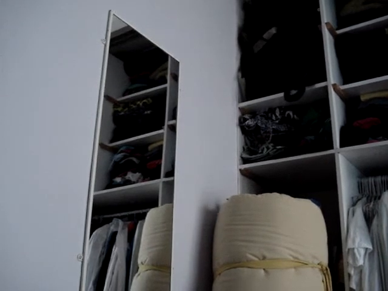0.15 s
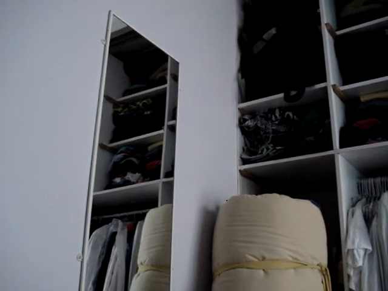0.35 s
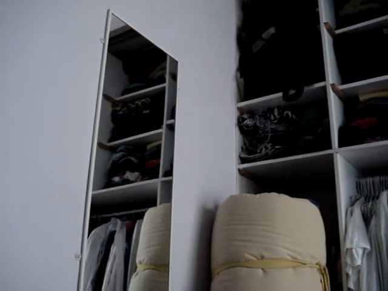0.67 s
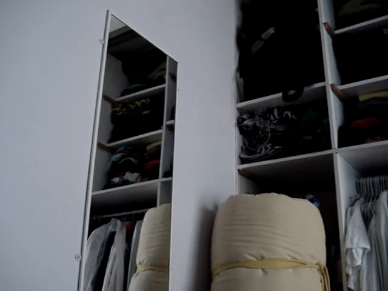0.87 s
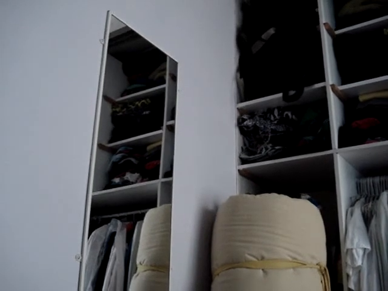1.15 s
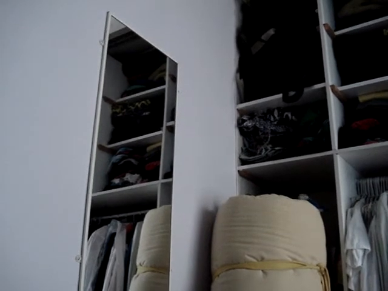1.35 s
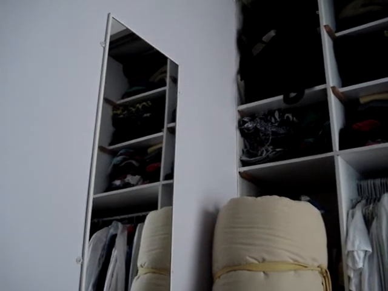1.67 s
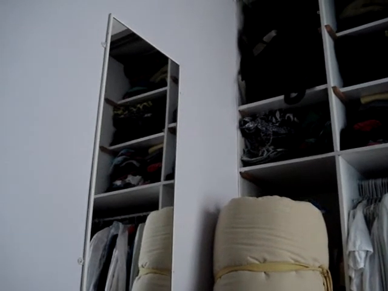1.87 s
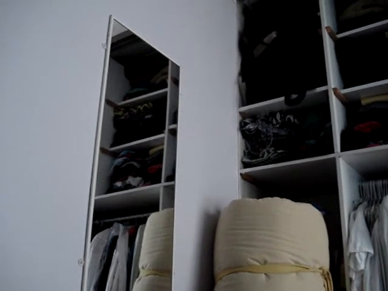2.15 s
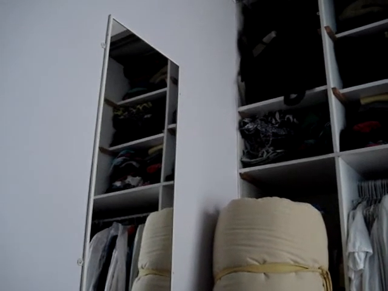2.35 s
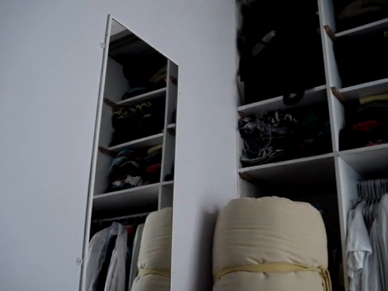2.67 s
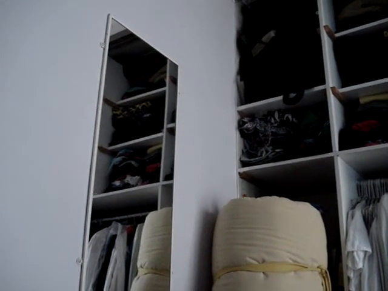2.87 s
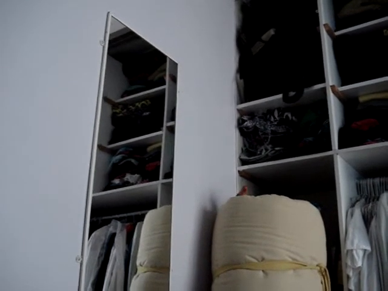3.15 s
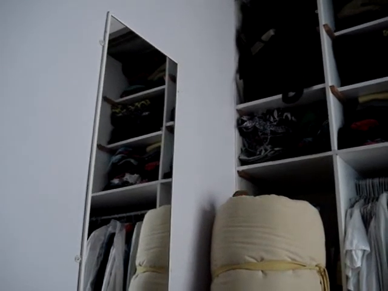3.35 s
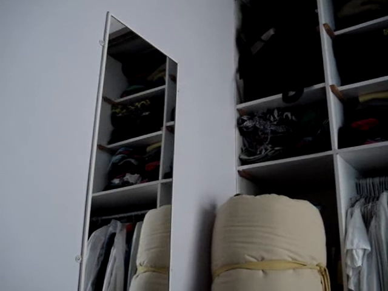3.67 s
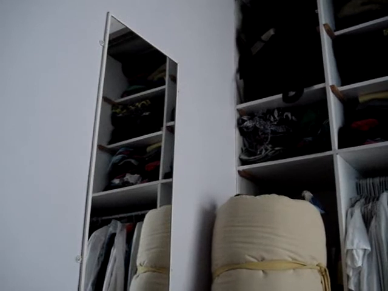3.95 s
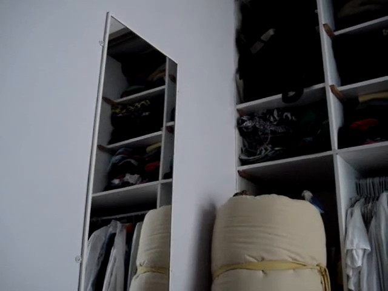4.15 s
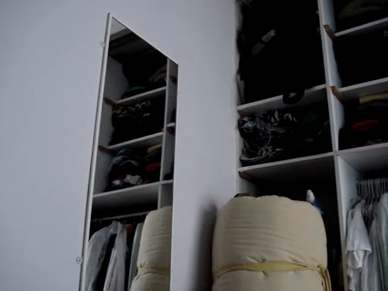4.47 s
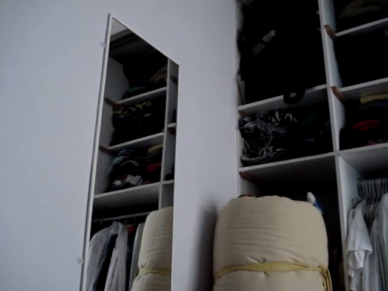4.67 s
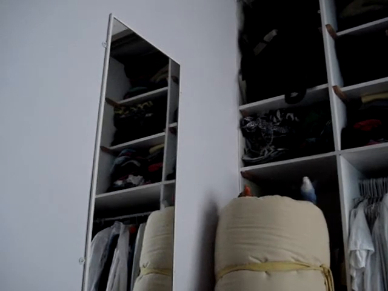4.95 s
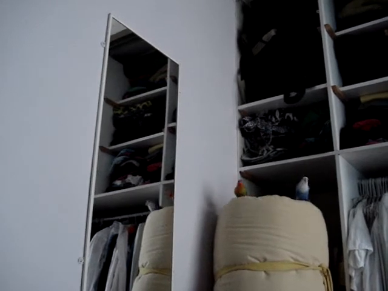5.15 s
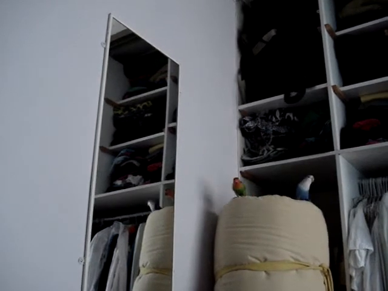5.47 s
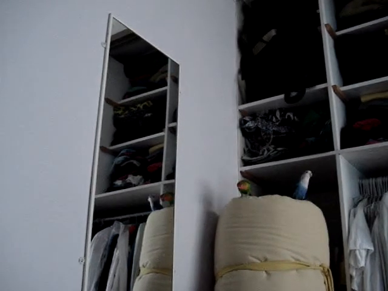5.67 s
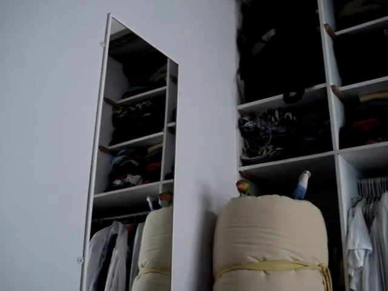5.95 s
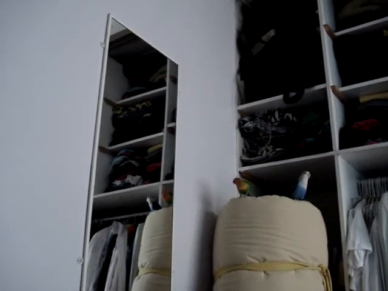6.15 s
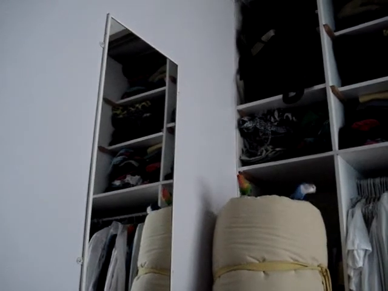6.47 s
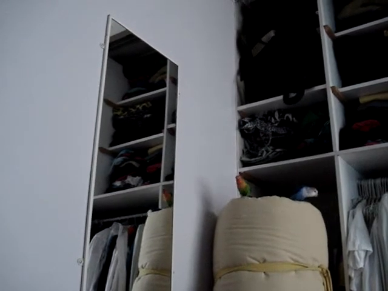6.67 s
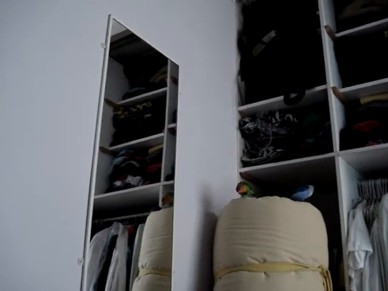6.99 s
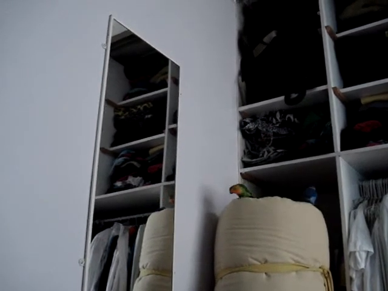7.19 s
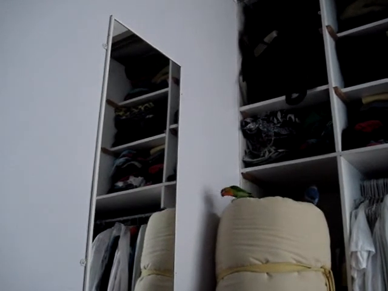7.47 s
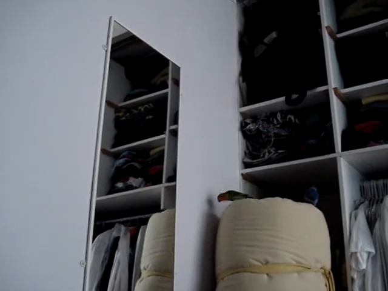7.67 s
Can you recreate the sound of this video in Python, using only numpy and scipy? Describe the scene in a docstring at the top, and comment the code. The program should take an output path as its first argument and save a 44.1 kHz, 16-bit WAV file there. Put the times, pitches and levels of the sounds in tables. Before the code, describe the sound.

A small, quiet bedroom with a soft, even rush of air and light recorder hiss. A pet lovebird gives one thin, very high peep, then after a long pause another. About a second later comes a rapid run of four chirps, a faint one first, then three loud, harsher ones, each lower. The microphone clicks and pops on the calls, and the room noise dips, then creeps back.

```python
"""Two thin, separate lovebird peeps, then a quick run of four harsher chirps, each lower than the last,
in a small, quiet bedroom. Each call is a short swooping tone with overtones, shaped by the throat and smeared
by scattered wall echoes and a noise tail. Decaying ticks and offsets make the microphone pop at the calls.
The run pushes the recorder's gain down, so the soft noise of the room sinks and creeps back; hiss lies on top."""
import sys
import numpy as np
from scipy import signal
from scipy.fft import rfft, irfft
from scipy.io import wavfile
from scipy.ndimage import uniform_filter1d

SR = 44100
rng = np.random.default_rng(int(sys.argv[2]) if len(sys.argv) > 2 else 0)


def pcm_store(signal):
    """Save signal as 16-bit PCM."""
    levels = np.round(np.clip(np.atleast_2d(signal), -1, 1) * 32767)
    wavfile.write(sys.argv[1], SR, levels.astype(np.int16).T)


N = 344752  # length of the scene in samples

# Lovebird calls: start_s, length_s, level_db, fade_db (fall over the call; negative swells), roughness_0to1,
# pitch_hz (middle), depth_share (swoop against the pitch), crest_share (place of the crest in the call)
CALLS = [ (0.955, 0.022, -21.5, -13, 0.1, 6200, 0.053, 0.52),
         (3.915, 0.021, -19.5, 2, 0.09, 6816, 0.058, 0.59), (5.042, 0.012, -31, 22, 0.21, 4175, 0.061, .03),
         (5.148, 0.024, -10, 7.5, 0.2, 3082, 0.099, 0.634), (5.227, .028, -10, 3, 0.25, 2786, 0.127, .7),
         (5.321, 0.02195, -10.5, 2.5, 0.57, 2520, 0.0895, 0.328)]
# How the throat and open beak pass each overtone: frequency_hz, gain_db
THROAT = [(1400, -25), (2000, -13), (2400, -4), (2800, -8), (3300, 1.5), (4200, -1.5), (5500, 3),
          (6400, -1), (7400, -1), (8400, -14), (9800, -19.5), (11200, -82.5)]
# Strongest echoes from the wardrobe, walls and ceiling: delay_s, level_db (against the direct sound)
ECHOES = [(.005, -5), (.013, -5.5), (.018, -8.5), (0.022, -3.5), (.035, -8), (.052, -6.5), (0.067, -13.5)]
# Microphone overloads: start_s, tick_db, offset_db, settle_s
MIC_POPS = [(0.9754, -16, -28, 0.0096), (0.9910, -18.5, -30.5, 0.013), (3.9190, -18, -29.5, 0.042),
            (5.1487, -0.5, -20, 0.066), (5.2300, -9.5, -31, 0.02), (5.238, -10, -50, 0.018),
            (5.256, -5.5, -44, 0.018), (5.3294, -6.5, -44, 0.022)]
# Colour of the room's steady air noise: frequency_hz, density_db (per Hz, relative)
AIR_SPECTRUM = [(15, -36), (25, -7.5), (60, -7.5), (120, -6.5), (260, -1.5), (480, -2), (900, -5),
                (1700, -9), (3000, -11), (6000, -18.5), (10000, -27.5), (12000, -68)]
# Colour of the recorder's own hiss: frequency_hz, density_db (per Hz, relative)
HISS_SPECTRUM = [(100, -11), (300, -16), (700, 4.5), (1400, 3), (2800, 0.5), (5600, -4), (10000, -11.5),
                 (12000, -48)]

SWOOP_TURNS = 1.15  # pitch swings per call
OVERTONE_DB = 1.5  # each overtone against the one below, before the throat
POP_SWING_BACK = 0.62  # pull of the offset back past the centre, per settling time
AIR_DB, HISS_DB = -53, -59  # rms levels ahead of the waver and the top cut
TOP_HZ = 10150  # upper limit of the recorder


def lovebirds():
    """Each call resonates in the throat and crosses the room; its level is that of its first 60 ms."""
    track = np.zeros(N)
    head = int(0.06 * SR)
    for start_s, length_s, level_db, fade_db, roughness, pitch_hz, depth, crest in CALLS:
        voice = syrinx(length_s, fade_db, roughness, pitch_hz, depth, crest)
        call = bedroom(colour(voice, THROAT))
        add(track, start_s, undb(level_db) * call / np.std(call[:head]))
    return track


def syrinx(length_s, fade_db, roughness, pitch_hz, depth, crest):
    """A swooping harmonic tone; roughness shakes its pitch and loudness and, by its square, adds rasp."""
    jitter, jitter_hz = 0.047, 450  # pitch shake: share at full roughness, top rate
    shimmer, shimmer_hz = 1.0, 800  # loudness shake: share at full roughness, top rate
    rasp = 0.18  # noise at full roughness
    attack_share, release_share = 0.23, 0.14  # of the call's length
    n = int(length_s * SR)
    progress = np.arange(n) / n

    shaken_hz = swoop(progress, pitch_hz, depth, crest) * (1 + roughness * jitter * wobble(jitter_hz)[:n])
    phase = 2 * np.pi * np.cumsum(shaken_hz) / SR
    tone = sum(undb(OVERTONE_DB * k) * np.sin(k * phase) for k in range(1, 5))

    flutter = 1 + roughness * shimmer * wobble(shimmer_hz)[:n]
    turbulence = roughness ** 2 * rasp * rng.standard_normal(n)

    attack = np.minimum(progress / attack_share, 1)
    release = np.minimum((1 - progress) / release_share, 1)
    envelope = np.sin(np.pi / 2 * attack * release) ** 2
    return (tone * flutter + turbulence) * envelope * undb(-fade_db * progress)


def swoop(progress, pitch_hz, depth, crest):
    """Pitch in Hz swings as a cosine about the middle pitch, highest at the crest."""
    return pitch_hz * (1 + depth * np.cos(2 * np.pi * SWOOP_TURNS * (progress - crest)))


def bedroom(sound):
    """Direct sound, briefly scattered echoes and a diffuse tail, with fresh scatter for every call."""
    tail_db, tail_t60_s, tail_build_s = -4.5, 0.35, 0.019
    echo_t60_s, echo_build_s = 0.0096, 0.0001
    response = undb(tail_db) * burst(tail_t60_s, tail_build_s)
    response[0] += 1  # direct sound
    for delay_s, level_db in ECHOES:
        add(response, delay_s, undb(level_db) * burst(echo_t60_s, echo_build_s))
    return signal.fftconvolve(sound, response)


def burst(t60_s, build_s):
    """Scattered reflections as noise that builds up and dies away by 60 dB in t60_s; energy 1."""
    t = np.arange(1, SR * 2 // 3) / SR
    build = 1 - np.exp(-t / build_s)
    decay = np.exp(-np.log(1000) * t / t60_s)
    scatter = rng.standard_normal(len(t)) * build * decay
    return scatter / np.linalg.norm(scatter)


def pops():
    """An overloaded microphone ticks and is thrown off centre, swings back past it and settles."""
    tick_s = 0.00004  # decay time of the tick
    track = np.zeros(N)
    t = np.arange(SR // 2) / SR
    for start_s, tick_db, offset_db, settle_s in MIC_POPS:
        swing = (1 - POP_SWING_BACK * t / settle_s) * np.exp(-t / settle_s)
        tick = undb(tick_db) * np.exp(-t / tick_s)
        add(track, start_s, undb(offset_db) * swing - tick)
    return track


def gain_control(sound):
    """Gain that senses only sound below a cutoff, so high peeps hardly move it; it ducks fast, recovers slowly."""
    sense_hz, threshold_db = 2600, -39
    slope, depth_db = 0.66, 12  # cut in dB per dB over the threshold, deepest cut
    recover_db_per_s = 7.0
    lowpass = signal.butter(4, sense_hz, fs=SR, output="sos")
    sensed = signal.sosfilt(lowpass, sound)
    power = np.abs(uniform_filter1d(sensed ** 2, size=660))  # 15 ms average
    level_db = 10 * np.log10(power + 1e-12)
    cut_db = np.clip(slope * (level_db - threshold_db), 0, depth_db)
    # Holding the peak of cut plus ramp lets each cut recover at a steady rate
    ramp_db = recover_db_per_s * np.arange(N) / SR
    return undb(ramp_db - np.maximum.accumulate(cut_db + ramp_db))


def room_air():
    """Coloured noise as a soft, even rush whose level hardly wavers."""
    waver_db, waver_hz = 0.52, 3.4  # spread, top rate
    return noise(AIR_SPECTRUM) * undb(AIR_DB + waver_db * wobble(waver_hz, size=N))


def noise(spectrum):
    """Random noise coloured by a spectrum table, rms 1."""
    return unit(colour(rng.standard_normal(N), spectrum))


def colour(sound, spectrum):
    """Filter a sound by a table of frequency_hz and gain_db, joined over log frequency."""
    table_hz, table_db = np.transpose(spectrum)
    hz = np.maximum(np.fft.rfftfreq(len(sound), 1 / SR), 1)
    gain_db = np.interp(np.log(hz), np.log(table_hz), table_db)
    return irfft(rfft(sound) * undb(gain_db), len(sound))


def wobble(top_hz, size=4096):
    """Random motion as noise low-passed at top_hz, rms 1."""
    lowpass = signal.butter(4, top_hz, fs=SR, output="sos")
    slow = signal.sosfilt(lowpass, rng.standard_normal(2 * size))
    return unit(slow[size:])  # drops the filter's start-up


def add(track, start_s, sound):
    """Mix a sound into the track at its start time."""
    i = int(start_s * SR)
    track[i:i + len(sound)] += sound[:len(track) - i]


def undb(db):
    """Decibels to amplitude gain."""
    return 10 ** (np.asarray(db) / 20)


def unit(x):
    """Scale to an rms of 1."""
    return x / np.sqrt(np.mean(x ** 2))


def scene():
    """Lovebirds over the room's air."""
    return (lovebirds() + room_air())[None]


def record(dry):
    """Microphone pops, gain control driven by the scene, recorder hiss and a steep top cut."""
    levelled = (dry[0] + pops()) * gain_control(dry[0])
    hissy = levelled + undb(HISS_DB) * noise(HISS_SPECTRUM)
    top_cut = signal.ellip(12, 0.1, 80, TOP_HZ, fs=SR, output="sos")
    return signal.sosfilt(top_cut, hissy)[None]


dry = scene()
out = record(dry)
pcm_store(out)
```